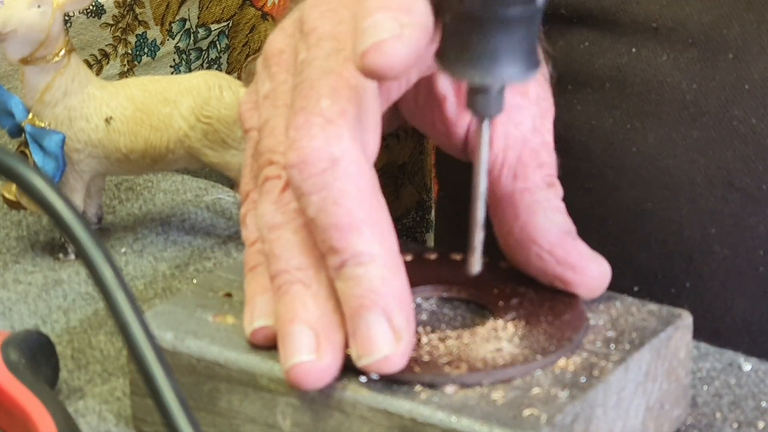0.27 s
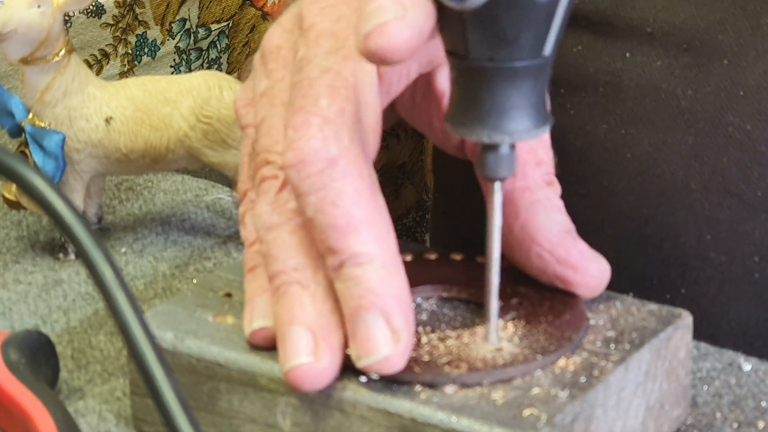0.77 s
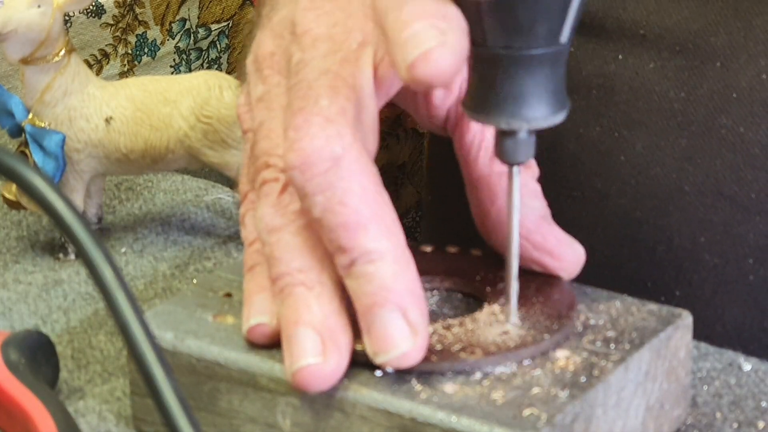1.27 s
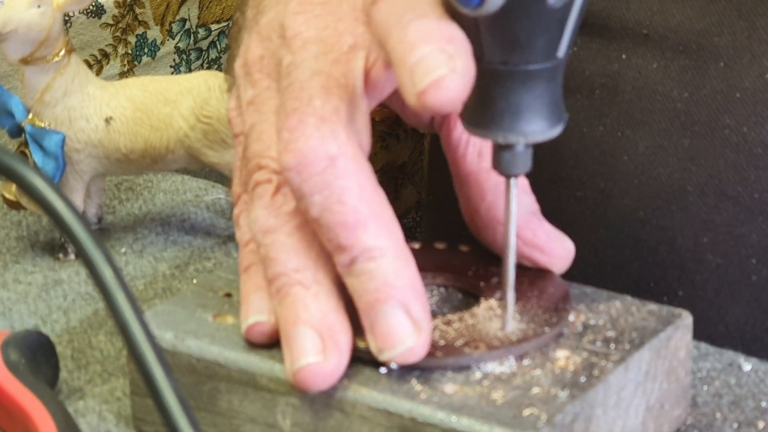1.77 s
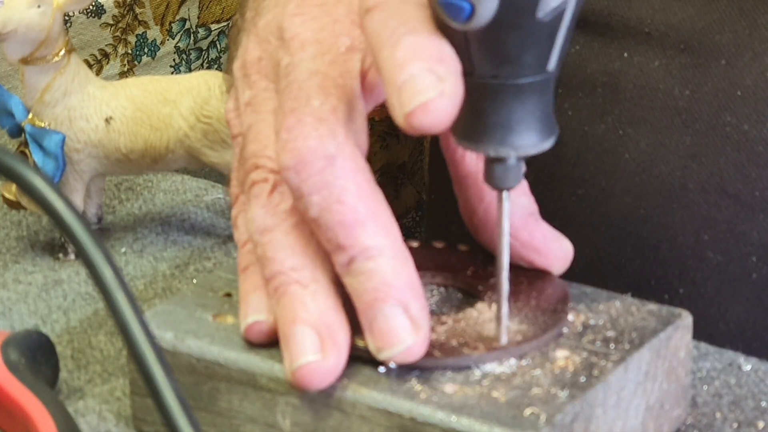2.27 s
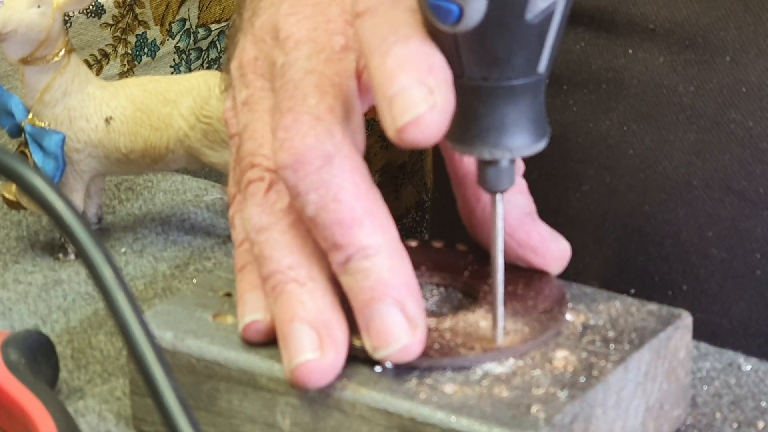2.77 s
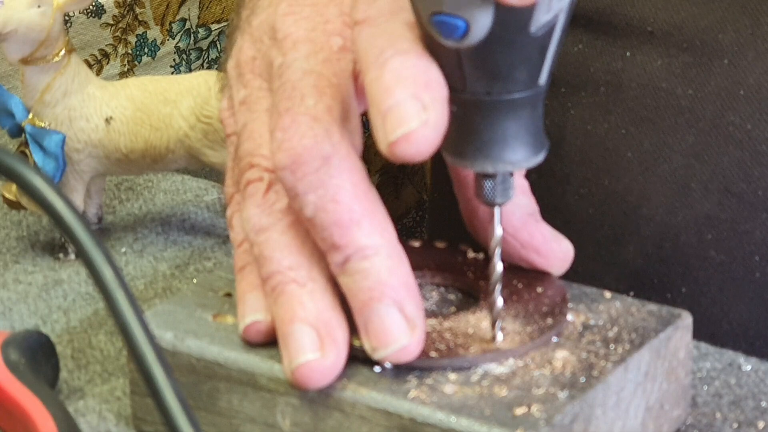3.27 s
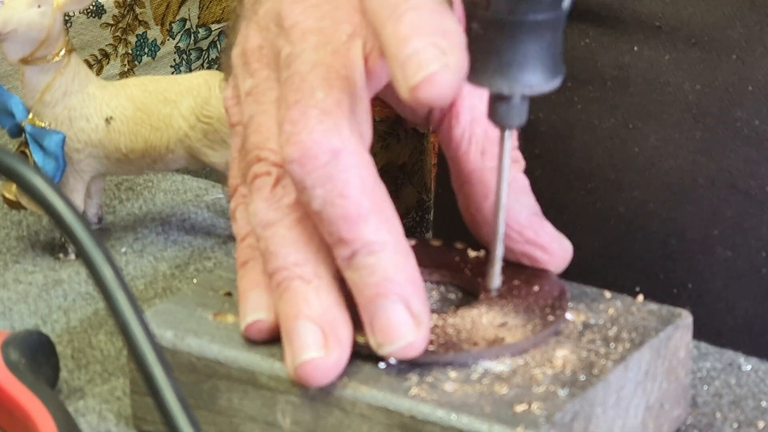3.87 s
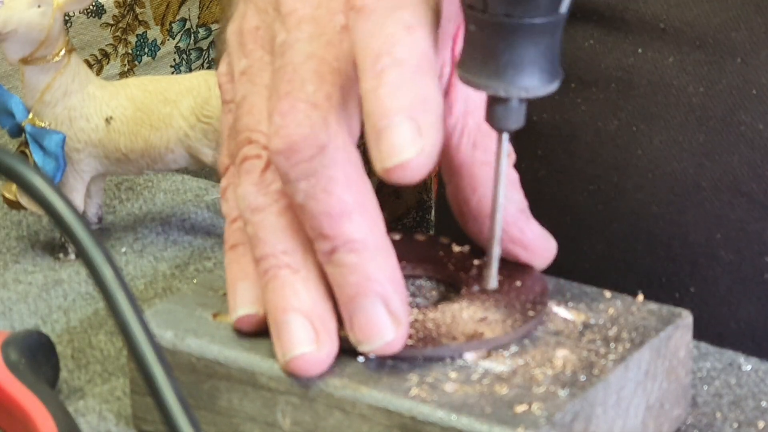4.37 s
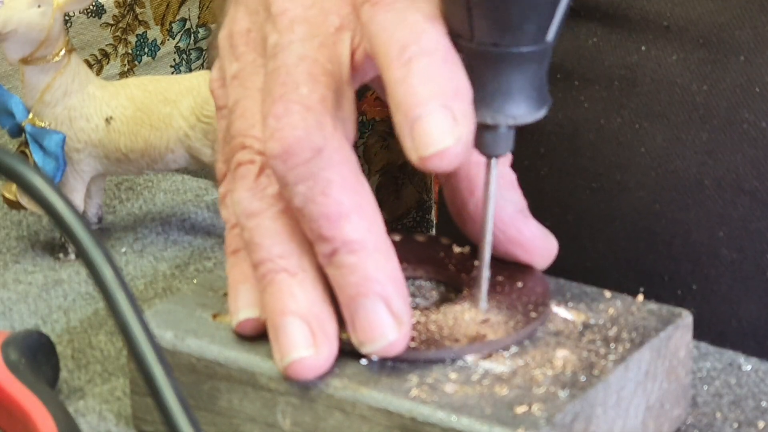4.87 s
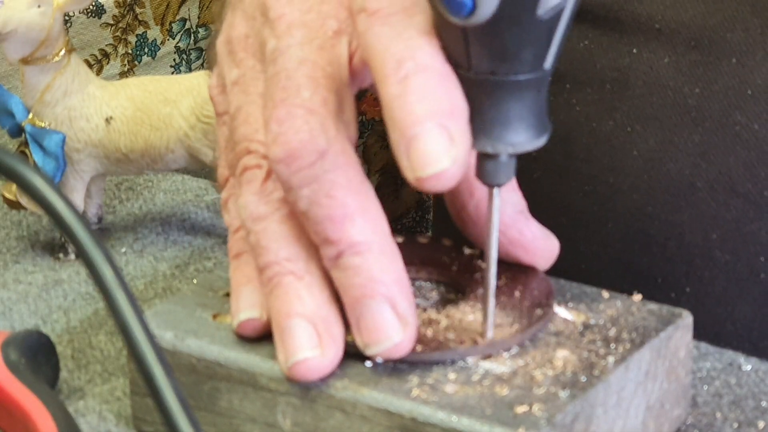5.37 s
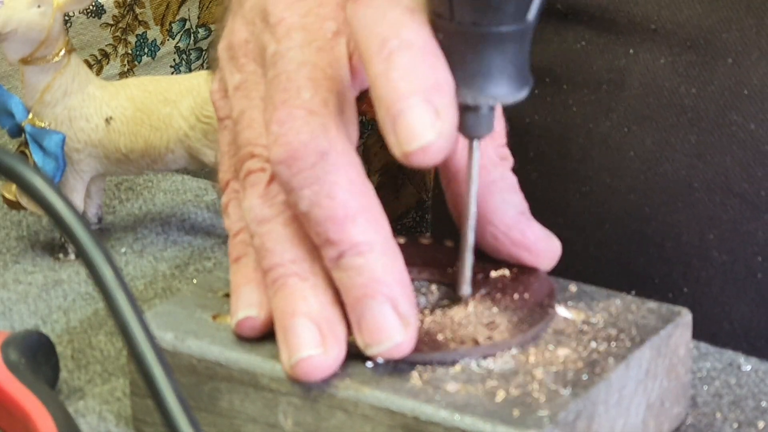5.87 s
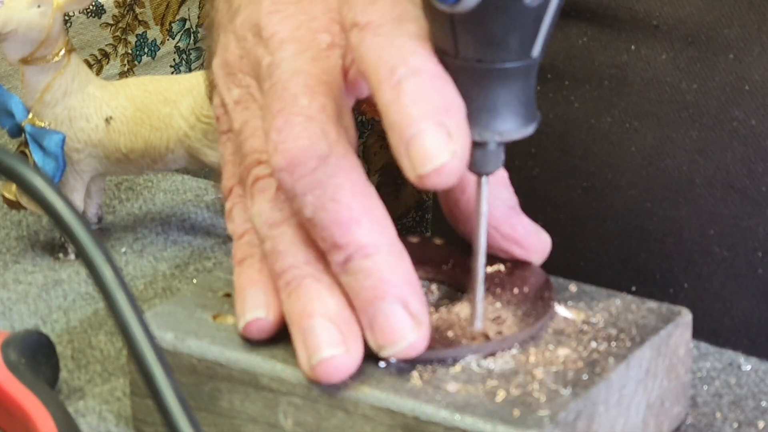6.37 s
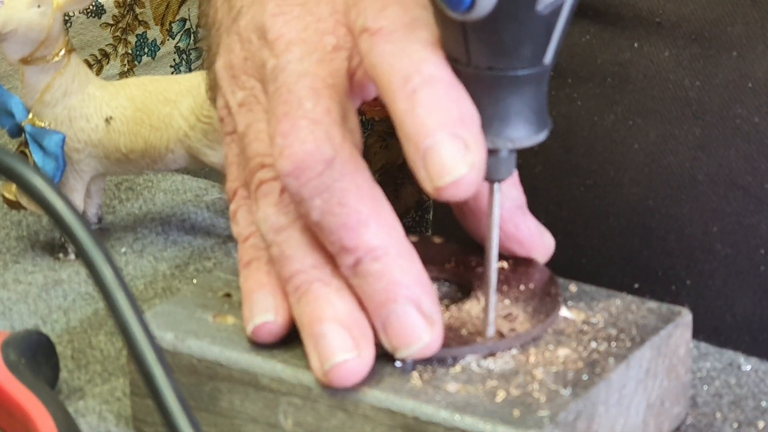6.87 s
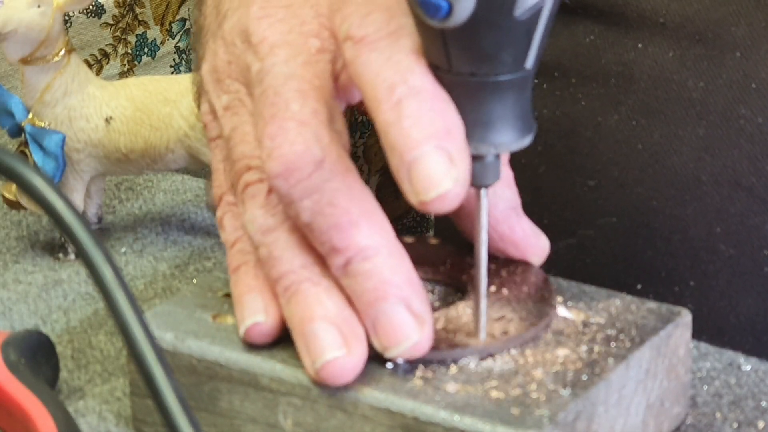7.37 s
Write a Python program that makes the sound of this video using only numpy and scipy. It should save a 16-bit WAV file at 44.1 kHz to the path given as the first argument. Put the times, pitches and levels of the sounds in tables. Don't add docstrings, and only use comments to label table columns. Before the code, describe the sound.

Bursts of drilling in a hard plate on a block, heard close and fairly dry in a small quiet room. A low, soft chatter gives way to a rising motor whine, then a long harsh ringing grind labours down to a stop. The motor recovers, a short skittering cut cracks and rattles, the whine climbs again, and a final strong grind sags in pitch. Low rumble and faint hum continue underneath.

```python
import sys
import numpy as np
from scipy import signal
from scipy.fft import rfft, irfft
from scipy.io import wavfile
from scipy.ndimage import uniform_filter1d, map_coordinates

SR = 44100
rng = np.random.default_rng(int(sys.argv[2]) if len(sys.argv) > 2 else 0)


def amplitude_ratio(level_db):
    exponent = np.asarray(level_db, float) / 20
    return 10 ** exponent


def int16_out(signal):
    q = np.round(np.clip(np.atleast_2d(signal).T, -1, 1) * 32767)
    wavfile.write(sys.argv[1], SR, q.astype(np.int16))


N = 336483
T, HZ = np.arange(N) / SR, np.fft.rfftfreq(N, 1 / SR)

# start_s, end_s, shortfall_turns_per_s at the start
SPIN_UPS = [
    (.4, 2.24, 38.5),
    (3.6, 5.38, 63),
    (5.96, 7.05, 30.5),
]
FULL_SPEED_TURNS_PER_S, SPIN_UP_S = 137.2, .295
# time_s, speed_turns_per_s
SAGS = [
    [(0, 88.5), (.09, 88.5), (.2, 86), (.38, 92)],
    [(2.29, 122), (2.4, 123), (2.5, 120.5), (2.66, 112), (2.7, 105.5), (2.9, 95.5), (3.1, 82), (3.2, 78),
     (3.3, 62)],
    [(5.5, 134), (5.6, 129), (5.7, 117), (5.78, 105), (5.9, 103), (5.95, 105)],
    [(7.11, 135), (7.15, 124), (7.3, 124), (7.5, 113.8), (7.54, 108.5), (7.63, 101)],
]

# time_s, pressure_db, block_lean_db, slip_0_1
LIGHT_CUT = [(0, -38.5, -1, 0), (.156, -40, 6.5, 0.9), (.194, -36.5, 8, 0), (.248, -41.5, 3.5, 0.14),
             (.28, -37, -4, 0), (.35, -37, -2.5, 0.8)]
DEEP_CUT = [(2.241, -32.5, 2, 0.86), (2.266, -29.5, -5, 0.26), (2.302, -16.5, -4.5, 0.4),
            (2.358, -17, -5.5, 1), (2.428, -14.5, -8, .12), (2.642, -15, -13, 0), (2.686, -17.5, -7, 0.37),
            (2.786, -17.5, -7.5, 0), (2.94, -22.5, -12, 0.27)]
STALLING = [(2.939, -19, -14.5, .07), (3.005, -21, -4, 0.53), (3.152, -23, -18, 0.9),
            (3.212, -28, -4.5, 0.87), (3.25, -55, 2, 0.28), (3.3, -85, 0, .3)]
SKIDDING_CUT = [(5.372, -52, 2, 1), (5.39, -25, -0.5, 0.9), (5.43, -20.5, -3.5, 0.99),
                (5.484, -26.5, 2, 0.87), (5.539, -14.5, -4.5, 0.77), (5.57, -18.5, -3, 0.82),
                (5.611, -16.5, -13.5, 0.61), (5.63, -39, -27, 0.45)]
BREAKING_OUT = [(5.615, -22, -19, 0.76), (5.65, -26, -5, 0.35), (5.705, -30, -4, 0.24), (5.727, -24, 6, 1),
                (5.776, -29, 1.5, 0.59), (5.832, -30.5, 1.5, 0.8), (5.885, -32.5, -1, 0.91),
                (5.911, -30, 7, 0.44), (5.96, -67, -15, 0.73)]
LAST_CUT = [(7.088, -39, 1, 0.4), (7.134, -19, -10, 0.24), (7.179, -17, -2, 0.97), (7.22, -22, -8.5, 0.92),
            (7.252, -15.5, -8, 0.56), (7.41, -16.5, -8.5, 0), (7.496, -17.5, -10.5, 0.096),
            (7.584, -18, -5, 0.18), (7.63, -19.5, -6, 0.93)]
HARDNESS_DB = [-3.5, 1.34, -2, 4.5, 4.5, 1.9]
# time_s, pressure_db, block_lean_db, rise_s
TOUCHES = [(0.368, -31, 2, 0.061), (2.167, -23, 2, 0.082), (3.644, -35.5, 0, 0.06),
           (3.662, -30.5, 4, 0.018), (7.02, -42.5, 6, 0.12), (7.078, -31.5, -3, 0.037)]
TOUCH_FALL_PER_RISE, TOUCH_RANGE_DB, TOUCH_SLIP = 0.79, 35.5, 0.89

BAND_EDGES_HZ = [150, 1040, 3000]
SHIFTING_DB = [2.5, 2.5, 2.2, 2.6]
# freq_hz, density_db_per_hz
CUT_COLOUR = [(29, -54), (50, -47), (96, -11), (163, -11.5), (361, -2), (449, -7), (614, -22), (1000, -17),
              (1160, 2), (2610, -4), (3020, -11.5), (6220, -9.5), (10300, -15.5), (14100, -25),
              (15900, -15.5)]
# freq_hz, width_hz, lift_db
PLATE_RINGS = [(399, 51, -19), (652, 38, 14.5), (721, 330, 12), (1182, 120, 4), (1777, 30, 10),
               (2048, 37, 7.5), (2657, 190, 5), (5585, 89, 5.5), (10270, 770, -8.5), (13460, 1200, 10.5)]
# freq_hz, left_minus_right_db
CUT_SIDE = [(60, .5), (180, 0), (550, -2.5), (1650, 0), (4970, 1), (15000, 4)]
# time_s, width_s, lift_db
JOLTS = [(.28, 0.083, 9), (2.19, 0.022, 26), (2.3, 0.08, 10.5), (3.0, 0.033, -5), (5.42, 0.052, 5),
         (5.82, 0.11, 14.5), (7.14, 0.062, 12)]
LOOSE_DB = [-9, -5.5]
SHAKE_DB, SHAKE_FOLLOWS, SHAKE_DB_PER_SAG = -40, 0.54, 0.4219
GRIT_DB, GRIT_DB_PER_SAG, GRIT_PER_LEAN = -8.5, 0.2878, 0.0091
SQUEAL_DB_PER_SAG = 0.0779

# freq_hz, width_hz, level_db
BLOCK_RINGS = [(212, 40, -6.5), (402, 80, 2), (612, 82, -1), (757, 110, -5.5)]
UNEVEN_DB = 1.5
# start_s, end_s
SEATED = [(2.27, 2.98), (7.13, 7.7)]
# start_s, end_s, blows_per_turn
CHATTER = [(0, .36, 2), (.05, .3, 4), (0, .27, 8), (0, .12, 15), (2.12, 2.22, 2), (2.7, 2.95, 12),
           (2.95, 3.1, 3), (3.05, 3.25, 4), (5.39, 5.56, 2), (5.54, 5.62, 3), (5.72, 5.8, 2),
           (5.76, 5.86, 5), (5.79, 5.85, 7), (6.97, 7.12, 2), (7.35, 7.55, 10), (0, .14, 3), (.33, .41, 3),
           (5.9, 5.925, 20)]
CHATTER_DB = [-2, -7.5, -5.5, -3.5, -5, -31, -14, -8.5, -17, -10, -8, -7.5, -0.5, 2, 4.5, -4.5, -6.5, -2]
# start_s, end_s, blows_per_turn
SINGING = [(2.66, 2.95, 4), (2.4, 2.66, 3), (2.41, 2.55, 6), (2.66, 2.72, 7), (2.41, 2.46, 9),
           (2.44, 2.52, 10), (2.46, 2.58, 17), (2.46, 2.52, 21), (2.51, 2.62, 15), (2.53, 2.65, 16),
           (2.59, 2.65, 19), (2.56, 2.62, 20), (2.59, 2.65, 22), (2.29, 2.58, 5), (2.74, 2.85, 14),
           (2.72, 2.78, 16), (2.82, 2.9, 21), (2.93, 3.03, 13), (.17, .23, 10), (.17, .23, 18),
           (7.26, 7.35, 9), (7.28, 7.42, 15), (7.29, 7.45, 17), (7.33, 7.45, 18), (7.34, 7.47, 14),
           (7.23, 7.4, 5), (7.45, 7.52, 21), (7.46, 7.52, 22), (7.52, 7.7, 6), (7.28, 7.5, 3),
           (7.52, 7.6, 16), (5.71, 5.745, 6.2), (2.33, 2.68, 2), (7.36, 7.7, 2), (7.24, 7.36, 27),
           (2.97, 3.08, 17), (2.98, 3.08, 20), (2.53, 2.65, 25), (2.46, 2.6, 22), (2.8, 2.86, 29),
           (5.385, 5.5, 9.2), (5.525, 5.585, 9.5), (5.72, 5.775, 2.2), (.17, .23, 14), (.27, .35, 15)]
SINGING_DB = [-4, -4.5, -6, -10.5, -15, 0.5, -4, 1.5, -6, -12, 3, -8, 0, -13, -3.5, -4, 1, -5.5, -9, -12.5,
              0, -17, -11, -7, -5, -14, -1, -2, -9, -5.5, -2, -10, -11.5, -13, -3.5, -1.5, -1.5, -5.5, -5.5,
              0, -2, 0, -6.5, -7.5, -9]
# freq_hz, left_lead_rad
TONE_PHASE = [(60, -.1), (130, 0.55), (300, -0.76), (780, -1.33), (1120, -0.3), (2330, -0.72), (4000, -1.2)]
# freq_hz, left_minus_right_db
TONE_SIDE = [(60, 0.0), (130, -2), (290, 2.5), (420, 2), (640, -3), (1410, -6), (3100, 12), (6820, 1.0),
             (15000, 5)]

# freq_hz, density_db_per_hz
HOUSING = [(180, -31), (300, -13), (447, -18), (813, -9.5), (1040, -44), (1230, -0.5), (2000, -8),
           (3690, -16), (4890, -9.5), (6490, -8.5), (7060, -10), (8760, -10), (9360, -12), (10900, -15),
           (15900, -15)]
# freq_hz, width_hz, lift_db
HOUSING_RINGS = [(7230, 300, 11), (4920, 92, 6), (5450, 200, 4), (3600, 220, -11), (4480, 250, -9),
                 (9100, 300, -10), (9450, 500, -11), (9850, 100, 8), (10300, 400, -3), (7850, 300, -8),
                 (6600, 200, -6), (6950, 60, 7)]
# freq_hz, left_minus_right_db
MOTOR_SIDE = [(60, 0), (180, 1), (550, 0), (1650, 2.2), (4970, 1), (8000, 1.5), (15000, 5)]
# freq_hz, share_0_1
WHIRR_SHARE = [(300, .1), (1000, .2), (4000, .2), (6500, .5), (10000, .62)]
ORDERS = [1, 2, 3, 6, 6.81, 9, 9.846, 10, 11.16, 12, 12.85, 14, 14.85, 15, 43, 88, 91, 94, 10.8]
ORDERS_DB = [-14, -16, -28, -27, -22, -2.5, -6.5, -13, -10, -2, -11, -18, -19, -18, -21, -26, -27, -26, -11]
ORDERS_GROWTH = [.9, .9, -1.2, .9, .9, 1.1, 1.1, .9, 1.6, .35, .9, 0, .3, -.7, 1.6, 3, 3, 3, 1.2]
# added_multiple_of_shaft_speed, level_db re motor
SIDES = [(-9, -17), (-7, -16), (-6, -6.5), (-3, -17), (3, -4), (5, -26), (6, -18)]
CHOPPER_HZ, CHOPPER_DB, STALL_DB = 8016, -58, -58
# start_s, end_s
STALL_S = (3.33, 3.57)
MOTOR_DB, MOTOR_DB_PER_SPEED = -40.5, 0.0367
GROWTH_DB_PER_SPEED = 0.404
WHIRR_GROWTH, SHELL_GROWTH, HOUSING_HOLD = .95, 0.032, 0.27
UPPER_SIDES_GROWTH, LOWER_SIDES_GROWTH = .5, -.2
LOAD_MUTE_DB = 12
POWER_OFF_S, POWER_ON_S, DYING_DB_PER_S, WAKING_DB_PER_S = 3.2, 3.67, 282, 450

# freq_hz, likeness_0_1
SAME = [(60, 0.95), (130, 0.99), (290, 0.96), (640, 0.4), (1400, 0.62), (3100, 0.76), (7000, 0.39)]
# freq_hz, twist_rad
TWIST = [(60, .1), (130, 0.13), (290, 0.12), (640, 0.28), (1400, 1.16), (3100, 1.04), (7000, 1.5)]

# freq_hz, density_db_per_hz
RUMBLE_COLOUR = [(8.8, -44), (15, 5), (30, 4), (43, -9), (65, -1.5), (81, -10), (157, -9), (184, -6),
                 (215, -17), (260, -1), (340, -41), (570, -120)]
# freq_hz, density_db_per_hz
ROOM_COLOUR = [(250, -2), (450, -11), (750, -5.5), (1060, -7.5), (3400, -19.5), (7000, -26.5), (9000, -28),
               (16000, -30)]
# freq_hz, level_db
HUM = [(99, 0), (189, -9)]
# time_s, width_s, lift_db
BUMPS = [(0, 1, 3.5), (2.6, 0.17, -12), (3.25, 0.042, 10), (3.65, 0.018, 9.5), (5.46, 0.068, 10),
         (5.74, 0.083, 13.5), (6.86, .1, 1.5)]
# time_s, width_s, lift_db
SWELLS = [(.7, 0.52, 3), (2.06, 0.033, 19), (3.0, 0.086, -9), (4.1, 0.77, 15.5), (5.2, 0.27, 9)]
RUMBLE_DB, HUM_DB, ROOM_DB = -46.5, -60.5, -52

# time_s, level_db, t60_s
CATCHES = [(2.275, -0.5, 0.037), (3.606, -17, 0.045), (3.66, -6, 0.047), (5.388, -9, 0.021),
           (5.536, -2, 0.049), (5.723, -29, 0.05), (5.538, 15.5, 0.0062), (5.549, 0, 0.015),
           (5.563, 2, 0.036), (5.596, 4, 0.02), (5.637, -6, 0.018), (5.7235, 3, .01), (5.734, 5, 0.011),
           (5.7465, -3, 0.013), (5.7533, 2.5, 0.02), (5.852, -0.5, 0.032), (5.908, 0, 0.073),
           (0.363, -8, 0.055)]
# time_s, level_db
TICKS = [(5.5024, -22), (5.5374, -32), (5.5862, -9), (5.7009, -11.5), (5.7249, -6.5), (5.7364, -8),
         (5.7464, -6.5), (5.7554, -18), (5.7724, -14), (5.7814, -16), (5.7914, -21), (5.8004, -18),
         (5.8104, -19), (5.8202, -13), (5.8474, -23), (5.8594, -13), (5.8674, -14), (5.908, -11.5),
         (5.9134, -16), (5.83, -13)]
TICK_TILT_DB = [3, 3, 3, 4, -3, -1, 1, -2, 5, 6, 6, 6, 18, 1, 19, -4, 4, -3, -3, -5]
TICK_EDGE_HZ, TICK_SPLIT_HZ, TICK_RISE_S, TICK_T60_S = 4800, 9500, .0012, .02
# time_s, level_db, freq_hz, t60_s
KNOCKS = [
    (6.631, -20, 147, 0.016),
]


def evened(x):
    return x / np.sqrt(np.mean(x ** 2) + 1e-20)


def read(points, at_hz):
    f, value = np.transpose(points)
    return np.interp(np.log(at_hz + 1), np.log(f + 1), value)


def lifted(spectrum, rings):
    return read(spectrum, HZ) + sum(db / (1 + (2 * (HZ - hz) / width) ** 2) for hz, width, db in rings)


def lifts(rows):
    return sum(db * np.exp(-((T - s) / width) ** 2) for s, width, db in rows)


def during(start_s, end_s):
    return uniform_filter1d(1. * ((T >= start_s) & (T < end_s)), 1000)


def drift(per_s, channels=2):
    knots = rng.standard_normal((int(N / SR * 60), channels))
    pole = np.exp(-2 * np.pi * per_s / 60)
    smooth = evened(signal.lfilter([1], [1, -pole], knots, axis=0))
    return np.array([np.interp(T * 60, np.arange(len(knots)), k) for k in smooth.T])


def stereo(pair, colour_db, side):
    a, b = rfft(pair)
    same = np.clip(read(SAME, HZ), 0, 1)
    ragged = np.sin(HZ / 130.) + np.sin(HZ / 47. + 1.5)
    path = np.exp(1j * (read(TWIST, HZ) * ragged - 4 * np.pi * HZ / SR))
    lean = amplitude_ratio(read(side, HZ) / 2)
    left = a * lean
    right = (same * a * path + np.sqrt(1 - same ** 2) * b) / lean
    return amplitude_ratio(colour_db) * np.array([left, right])


def plate_noise():
    return stereo(rng.standard_normal((2, N)), lifted(CUT_COLOUR, PLATE_RINGS), CUT_SIDE)


def shaft_turns():
    def recovering(since_s, short):
        return FULL_SPEED_TURNS_PER_S - short * np.exp(-since_s / SPIN_UP_S)

    leaving = [(end, recovering(end - start, short)) for start, end, short in SPIN_UPS]
    speed = np.interp(T, *np.transpose(sorted(sum(SAGS, leaving))))
    for start, end, short in SPIN_UPS:
        free = (T > start) & (T < end)
        speed[free] = recovering(T[free] - start, short)
    return np.cumsum(speed) / SR


def repeating(turns, memory_turns, top_order):
    size, count = 2048, int(turns[-1]) + 2
    fresh = rng.standard_normal((count, 2, top_order, 2)) @ [1, 1j]
    orders = signal.lfilter([1], [1, -1 + 1 / memory_turns], fresh, axis=0)
    orders = orders + memory_turns ** .5 * fresh[0] / 2
    rings = irfft(np.pad(orders, ((0, 0), (0, 0), (1, 0))), size)
    rings = np.concatenate([rings, rings[..., :1]], axis=2)
    where = [np.minimum(turns, count - 1), turns % 1 * size]
    return evened(np.array([map_coordinates(rings[:, k], where, order=1) for k in range(2)]))


def hand():
    touches = []
    for s, db, lean, rise in TOUCHES:
        touches.append([(s - rise, db - TOUCH_RANGE_DB, lean, TOUCH_SLIP),
                        (s, db, lean, TOUCH_SLIP),
                        (s + TOUCH_FALL_PER_RISE * rise, db - TOUCH_RANGE_DB, lean, TOUCH_SLIP)])
    cuts = [LIGHT_CUT, DEEP_CUT, STALLING, SKIDDING_CUT, BREAKING_OUT, LAST_CUT]
    out = np.zeros((4, N))
    out[0] = -99
    for rows, hard_db in zip(cuts + touches, HARDNESS_DB + [0] * len(touches)):
        s, *cols = np.transpose(rows)
        i = slice(max(round(s[0] * SR), 0), round(s[-1] * SR))
        new = np.array([np.interp(T[i], s, c) for c in cols + [hard_db + 0 * s]])
        out[:, i] = np.where(new[0] > out[0, i], new, out[:, i])
    return out


def patchy(x, depth_db):
    z = signal.stft(x, nperseg=512)[2]
    patches = uniform_filter1d(rng.standard_normal(z.shape[1:]), 5, axis=0)
    patches = evened(uniform_filter1d(patches, 14, axis=1))
    return signal.istft(z * amplitude_ratio(depth_db * patches), nperseg=512)[1][:, :N]


def chatter(turns):
    speed, blows = np.gradient(turns)[::100] * SR, np.arange(2, 9)[:, None]
    near = sum(amplitude_ratio(db) / (1 + (2 * (blows * speed - hz) / width) ** 4) for hz, width, db in BLOCK_RINGS)
    near = near / np.sqrt((near ** 2).sum(0) + amplitude_ratio(2 * UNEVEN_DB))
    seated = sum(during(*span) for span in SEATED)
    weights = [(k, seated * np.interp(T, T[::100], w)) for k, w in zip(blows[:, 0], near)]
    for (start, end, k), db in zip(CHATTER + SINGING, CHATTER_DB + SINGING_DB):
        weights.append((k, amplitude_ratio(db) * during(start, end)))
    out, phases = np.zeros(N), rng.random(40)
    for k, w in weights:
        on = w > 1e-4
        out[on] += 2 ** .5 * w[on] * np.sin(2 * np.pi * (k * turns[on] + phases[int(k)]))
    lean = amplitude_ratio(read(TONE_SIDE, HZ) / 2) * np.exp(.5j * read(TONE_PHASE, HZ))
    return irfft(rfft(out * amplitude_ratio(1.5 * drift(29.0, channels=1))) * [lean, 1 / lean], N)


def cutting(turns):
    press_db, lean_db, slip, hard_db = hand()
    slip = np.clip(slip, 0, 1)
    sag = FULL_SPEED_TURNS_PER_S - np.gradient(turns) * SR
    shake_db = SHAKE_DB + SHAKE_FOLLOWS * press_db + SHAKE_DB_PER_SAG * sag + lifts(JOLTS)
    grit_db = GRIT_DB + hard_db + press_db + GRIT_DB_PER_SAG * sag + GRIT_PER_LEAN * lean_db
    levels_db = [shake_db, press_db + lean_db, press_db, grit_db]

    bite = evened(.5 + np.exp(-(turns % 1) / 5.7))
    bursts = evened(uniform_filter1d(rng.standard_normal(N), 60))
    chips = evened(rng.standard_normal((2, N)) * amplitude_ratio(1.33 * bursts))
    pattern = repeating(turns, 6.7, top_order=36)
    scrape = np.sqrt(1 - slip) * pattern * 0.52 + np.sqrt(slip) * chips
    coarse = .45 * scrape + .9 * chips
    colour_db = lifted(CUT_COLOUR, PLATE_RINGS)
    body, grit = (stereo(bite * drive, colour_db, CUT_SIDE) for drive in (scrape, coarse))

    band, parts = np.searchsorted(BAND_EDGES_HZ, HZ), []
    for k, z in enumerate([body, body, body, grit]):
        x = patchy(irfft(z * (band == k), N), SHIFTING_DB[k])
        local = uniform_filter1d((x ** 2).mean(0), 2500)
        parts.append(x / np.sqrt(abs(local) + 1e-12))
    unbalance = 2 ** .5 * np.sin(2 * np.pi * turns)
    parts[0] = amplitude_ratio(LOOSE_DB[0]) * parts[0] + unbalance
    parts[1] = amplitude_ratio(LOOSE_DB[1]) * parts[1] + chatter(turns)
    finest = irfft(rfft(parts[3]) * (HZ > 11500), N)
    parts[3] = parts[3] + finest * (amplitude_ratio(SQUEAL_DB_PER_SAG * sag) - 1)
    touching = press_db > -90
    return sum(uniform_filter1d(amplitude_ratio(db) * touching, 300) * x for db, x in zip(levels_db, parts))


def motor(turns):
    speed = np.gradient(turns) * SR
    short = speed - FULL_SPEED_TURNS_PER_S
    short_db = GROWTH_DB_PER_SPEED * short
    whirr = amplitude_ratio(WHIRR_GROWTH * short_db) * repeating(turns, 25., top_order=115)
    hiss, share = rng.standard_normal((2, N)), read(WHIRR_SHARE, HZ)
    whirr_z, hiss_z = [stereo(x, lifted(HOUSING, HOUSING_RINGS), MOTOR_SIDE) for x in (whirr, hiss)]
    mixed = np.sqrt(share) * whirr_z + np.sqrt(1 - share) * hiss_z
    shell = (HZ > 1100) & (HZ < 2100)
    out = evened(irfft(mixed * ~shell, N) + amplitude_ratio(SHELL_GROWTH * short_db) * irfft(mixed * shell, N))

    tones = []  # cycles, level_db
    for k, db, grow in zip(ORDERS, ORDERS_DB, ORDERS_GROWTH):
        housing_db = read(HOUSING, k * speed) - read(HOUSING, k * FULL_SPEED_TURNS_PER_S)
        tones.append((k * turns, db + grow * short_db + HOUSING_HOLD * housing_db))
    loaded = 1 - sum(during(start, end) for start, end, _ in SPIN_UPS)
    for k, db in SIDES:
        growth = UPPER_SIDES_GROWTH if k > 0 else LOWER_SIDES_GROWTH
        tones.append((CHOPPER_HZ * T + k * turns, db + growth * short_db - LOAD_MUTE_DB * loaded))
    for cycles, db in tones:
        mean_hz = cycles[-1] / T[-1]
        port_phase = rng.uniform(-.25, .25) * min(mean_hz / 1200, 1)
        phase = .04 * drift(6., channels=1) + rng.random() + [[0], [port_phase]]
        waver_db = 1.8 * drift(4.) + 1.8 * (cycles[-1] < 3000 * T[-1]) * drift(9., channels=1)
        out += amplitude_ratio(db - 1 + waver_db) * np.sin(2 * np.pi * (cycles + phase))
    out_of_power_db = np.minimum(DYING_DB_PER_S * (T - POWER_OFF_S), WAKING_DB_PER_S * (POWER_ON_S - T))
    return amplitude_ratio(MOTOR_DB + MOTOR_DB_PER_SPEED * short - np.maximum(out_of_power_db, 0)) * out


def chopper():
    stuck = uniform_filter1d(1. * ((T > STALL_S[0]) & (T < STALL_S[1])), 900)
    running = amplitude_ratio(CHOPPER_DB + 1.1 * drift(4.)) * (abs(T - 3.45) > .2)
    return (running + amplitude_ratio(STALL_DB) * stuck) * np.sin(2 * np.pi * CHOPPER_HZ * T + [[0], [1.2]])


def room_tone():
    level = [(60, 0), (9000, 0)]
    rumble_db = lifted(RUMBLE_COLOUR, [(31.5, 6.9, -14)])
    low = evened(irfft(stereo(rng.standard_normal((2, N)), rumble_db, level) * (HZ < 250), N))
    hiss_z = stereo(rng.standard_normal((2, N)), read(ROOM_COLOUR, HZ), level)
    high = evened(irfft(hiss_z * (HZ >= 250), N))
    hum = sum(amplitude_ratio(db + 2.5 * drift(2., channels=1)) * np.sin(2 * np.pi * hz * T) for hz, db in HUM)
    deep = irfft(rfft(low) * (HZ < 38), N)
    rumble = deep + amplitude_ratio(lifts(BUMPS)) * (low - deep)
    return amplitude_ratio(RUMBLE_DB) * rumble + amplitude_ratio(HUM_DB + lifts(SWELLS)) * hum + amplitude_ratio(ROOM_DB) * high


def walls(x, t60_s=0.18):
    u = np.arange(SR // 2) / SR
    tail = rng.standard_normal((2, len(u))) * amplitude_ratio(-60 * u / t60_s) * (u > .004)
    tail = signal.lfilter([1, -1], np.convolve([1, -.5], [1, -.96]), tail)
    return signal.fftconvolve(x, tail / np.linalg.norm(tail[0]), axes=1)[:, :N]


def catches():
    crack = evened(irfft(plate_noise() * (HZ > 400), N))
    return crack * sum(amplitude_ratio(db - 17.5 - 60 * np.maximum(T - s, 0) / t60) * (T > s) for s, db, t60 in CATCHES)


def ticks():
    z = plate_noise() * (HZ > TICK_EDGE_HZ)
    middle, finest = [evened(irfft(z * part, N)) for part in (HZ < TICK_SPLIT_HZ, HZ >= TICK_SPLIT_HZ)]
    u, level = np.arange(2000) / SR, np.zeros((2, N))
    for (s, db), tilt_db in zip(TICKS, TICK_TILT_DB):
        shape = np.minimum(u / TICK_RISE_S, 1) * amplitude_ratio(db - 4.5 - 60 * u / TICK_T60_S)
        level[:, round(s * SR):][:, :len(u)] += shape * amplitude_ratio(np.array([[-tilt_db], [tilt_db]]))
    return middle * level[0] + finest * level[1]


def knocks():
    out = np.zeros(N)
    for s, db, hz, t60 in KNOCKS:
        u = np.maximum(T - s, 0)
        out += amplitude_ratio(db - 60 * u / t60) * np.sin(2 * np.pi * hz * u)
    return out


def scene():
    turns = shaft_turns()
    tool = cutting(turns) + motor(turns) + chopper() + catches() + ticks()
    tool = irfft(rfft(tool) / (1 + (42 / (HZ + 1)) ** 8), N)
    return tool + amplitude_ratio(-12.5) * walls(tool) + knocks() + room_tone()


def top_cut(x):
    return signal.sosfilt(signal.butter(12, 16080, fs=SR, output="sos"), x)


def record(dry):
    edge = signal.firwin(255, 15850, window=("kaiser", 8), fs=SR)
    mix = np.clip(signal.oaconvolve(dry, edge[None], "same"), -1, 1)
    return top_cut(mix)


dry = scene()
out = record(dry)
int16_out(out)
```